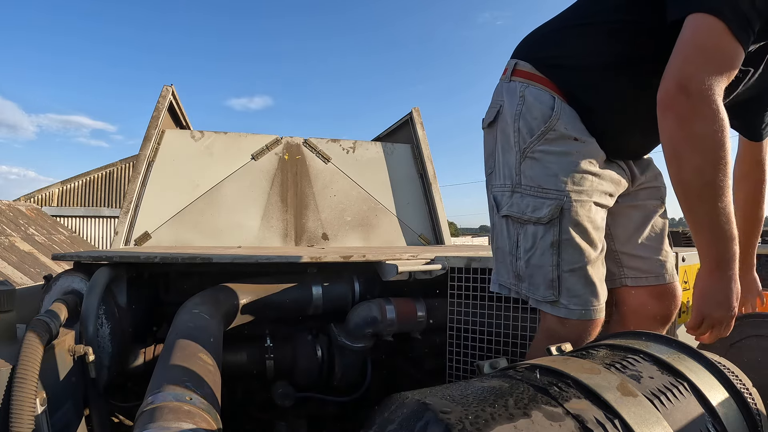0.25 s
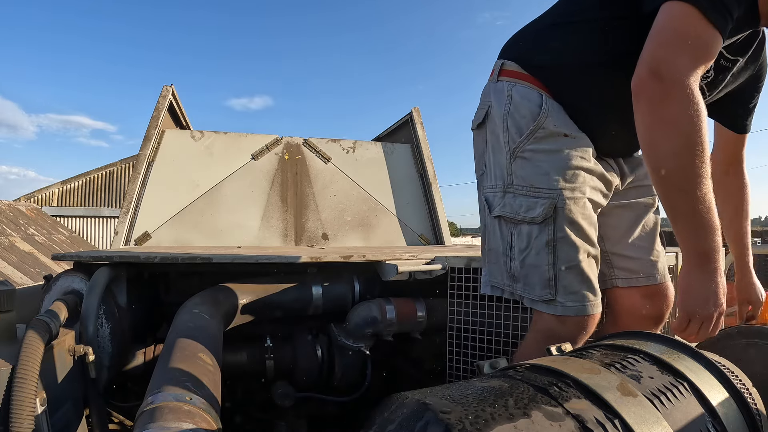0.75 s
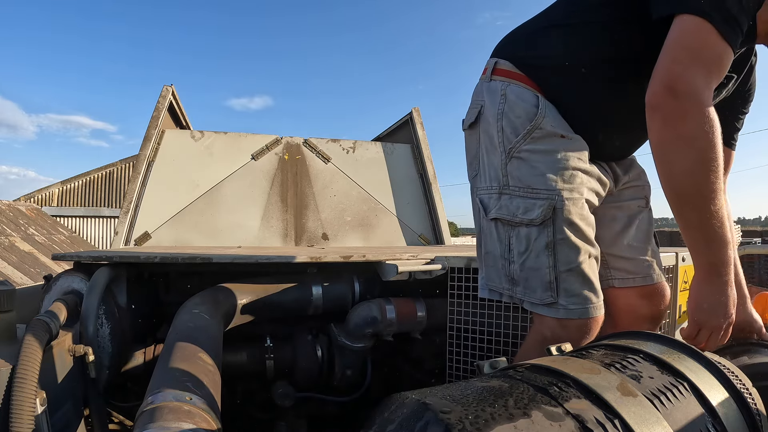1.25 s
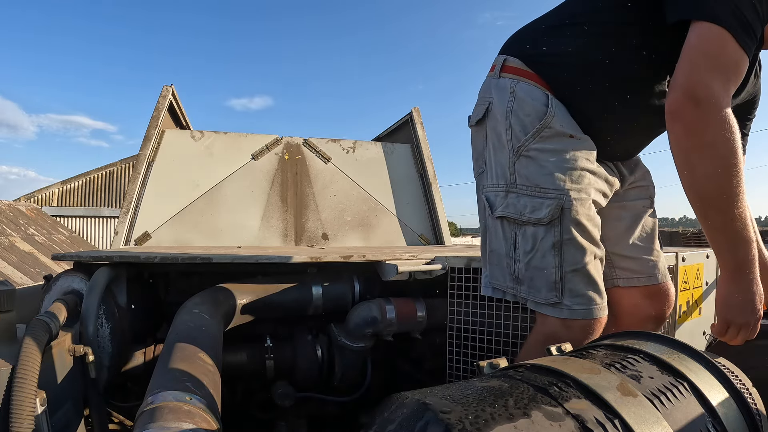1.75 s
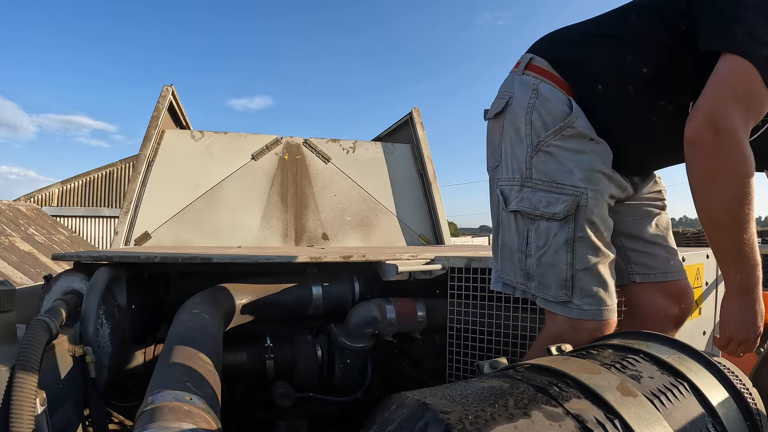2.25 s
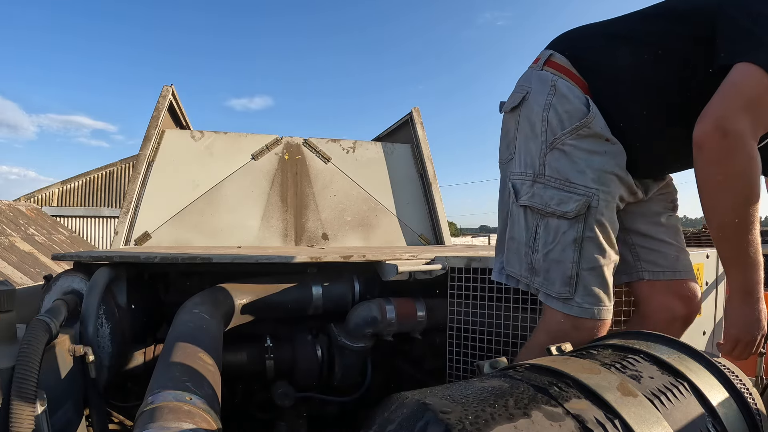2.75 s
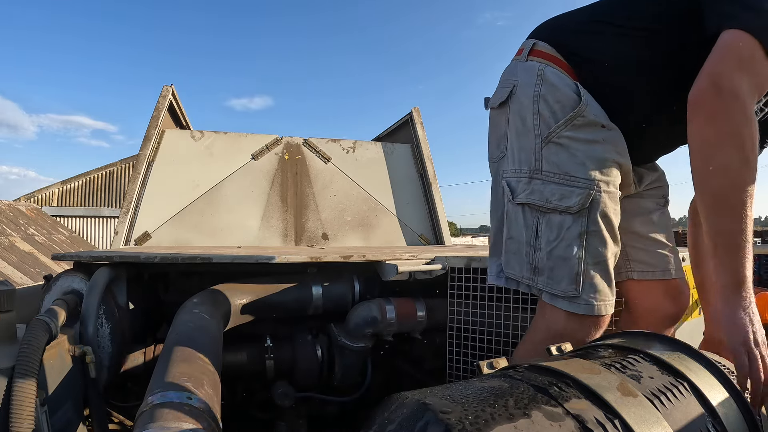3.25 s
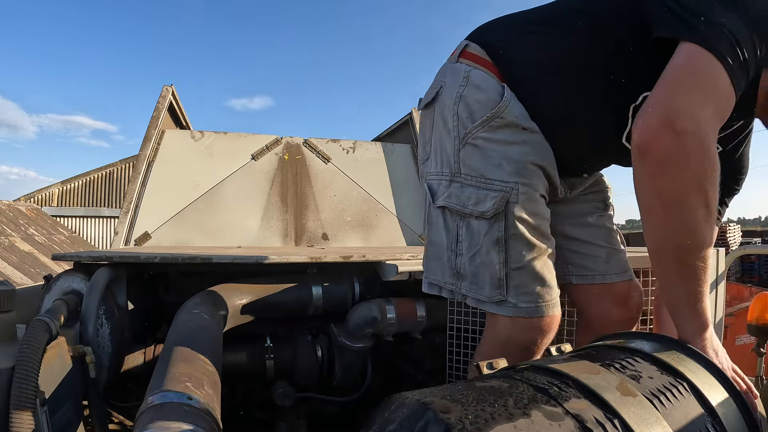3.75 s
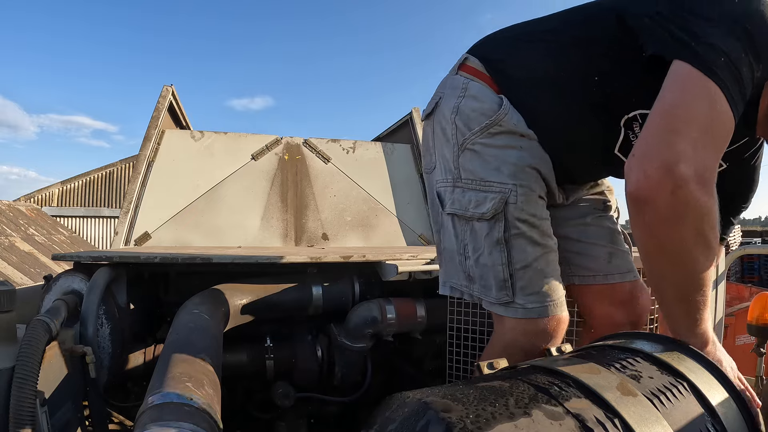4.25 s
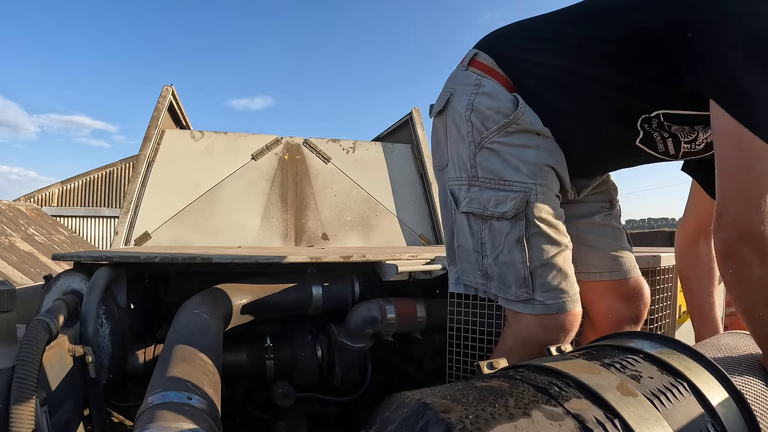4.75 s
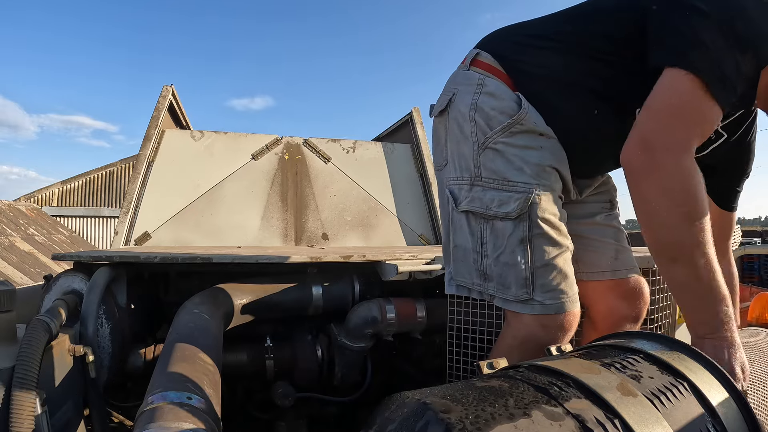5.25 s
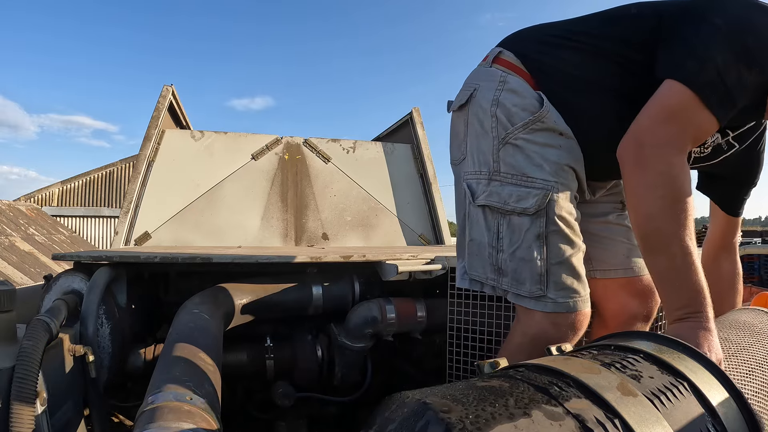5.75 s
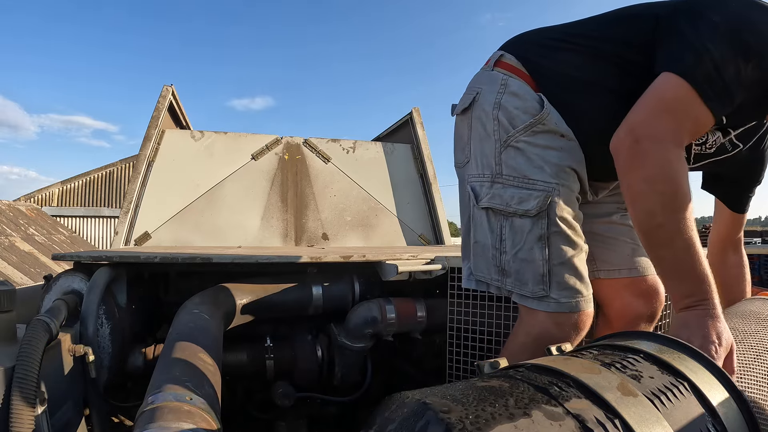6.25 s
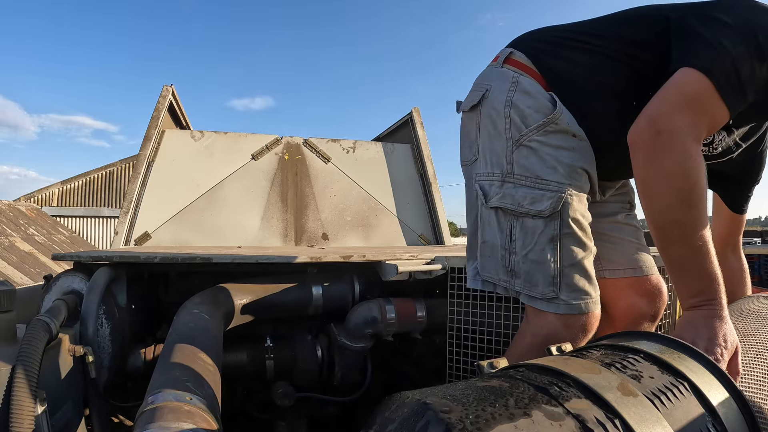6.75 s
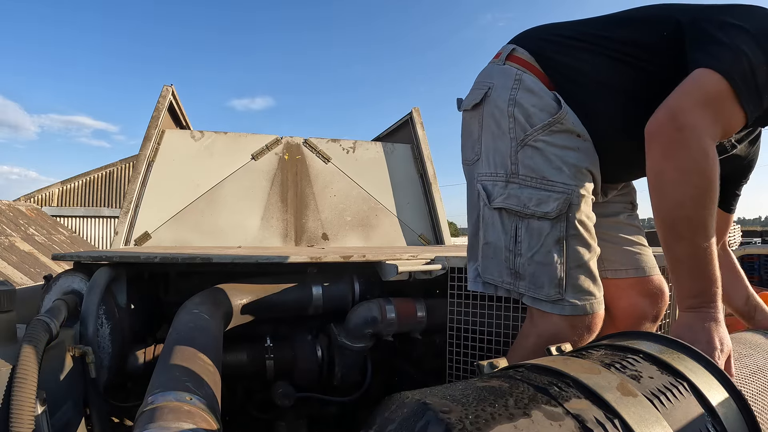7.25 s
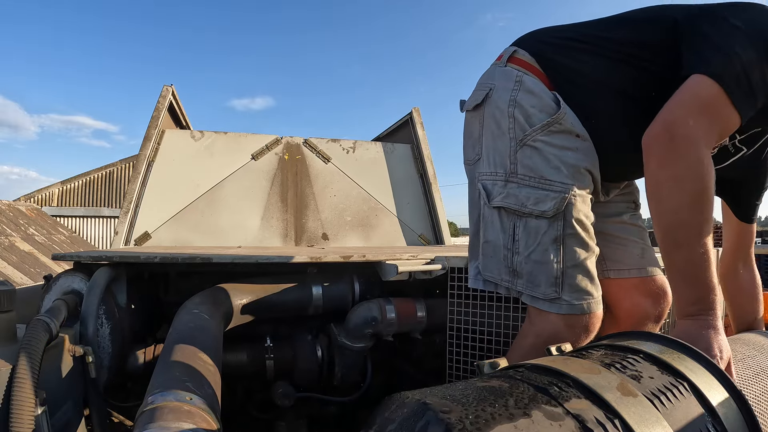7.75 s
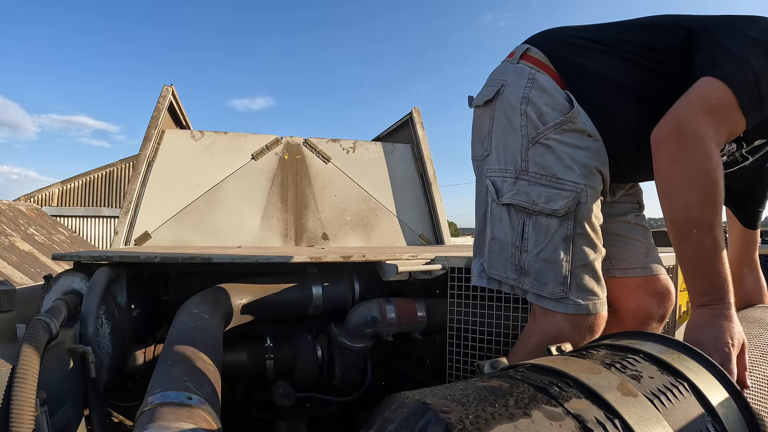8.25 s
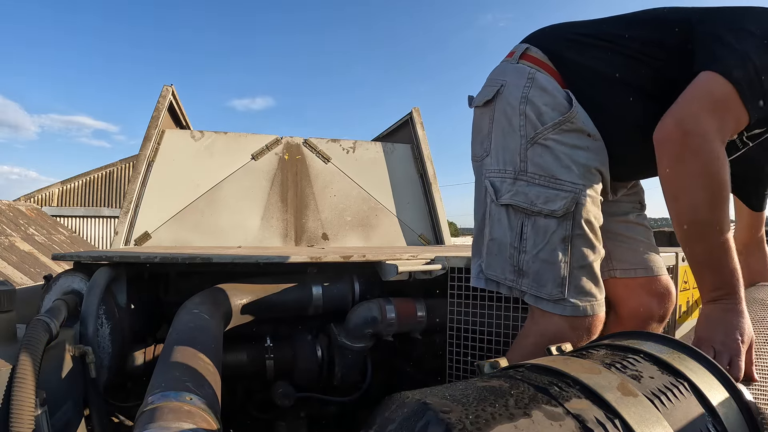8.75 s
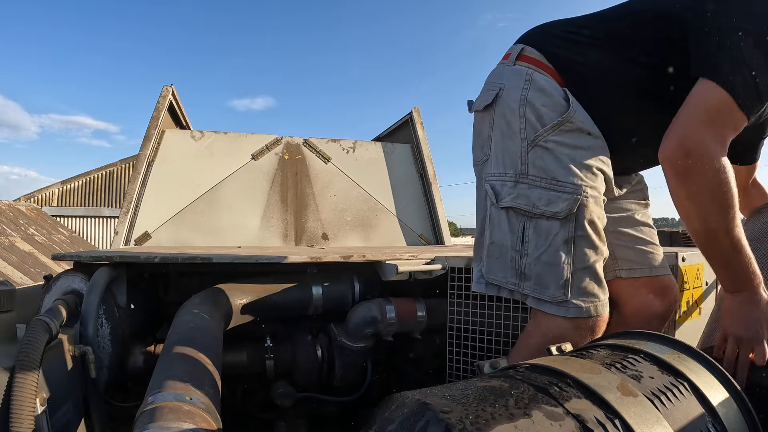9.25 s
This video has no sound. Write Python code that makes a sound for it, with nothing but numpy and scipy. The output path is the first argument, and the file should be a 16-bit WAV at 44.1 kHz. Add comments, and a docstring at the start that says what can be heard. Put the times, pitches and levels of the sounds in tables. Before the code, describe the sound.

Outdoors, close to a large steel filter canister on a machine. A clank and hollow boom open, then bursts of knocks, raspy latch snaps and gritty drags come with uneven pauses. Heavier booming bangs and a short groan follow midway, then more clanks near the end. Faint low rumble lies underneath, with a few distant bird chirps.

```python
"""Wrestling a filter out of a steel canister

Outdoors, latches are snapped open on a big steel air-filter canister and the long element is wrestled out.
Knocks ring modes of wall and latches, and soft juddering pushes boom in the drum. Between them clumped
stick-slip grains make the seal and mesh drag and grind, bright grains rasp and slipping contacts groan.
Coloured noise rumbles underneath; gliding sines are a few far birds and last a faint, nearly steady insect."""
import sys
import numpy as np
from scipy import signal
from scipy.fft import rfft, irfft, next_fast_len
from scipy.io import wavfile

SR = 44100
rng = np.random.default_rng(int(sys.argv[2]) if len(sys.argv) > 2 else 0)


def file_out(sig):
    """Save sig as 16-bit WAV at sys.argv[1]."""
    # one column per channel
    cols = np.atleast_2d(sig).T
    # limit, then scale
    lim = np.clip(cols, -1, 1)
    pcm = np.round(lim * 32767).astype(np.int16)
    wavfile.write(sys.argv[1], SR, pcm)


N = 418509   # length in samples

# Modes of the drum's body. Each row: frequency in Hz, relative level in dB, undamped decay by 60 dB in seconds.
DRUM_MODES = [(66, -16, 0.054), (89, 0, 0.33), (109.3, -11, 0.18), (130.7, 3, 0.15), (151, 2, 0.22),
              (182.4, 4.5, 0.092), (244.3, 4.5, 0.11), (297, 0.5, 0.16), (340.6, -9, 0.4),
              (402.4, -9, 0.37)]
# Modes of the steel wall. Each row: frequency in Hz, relative level in dB, undamped decay by 60 dB in seconds.
WALL_MODES = [(445, 8.5, 0.022), (560, 0, 0.1), (656, 2.5, 0.023), (799, 7, 0.038), (872, 2, 0.078),
              (988, 9.5, 0.018), (1150, 5.5, 0.038), (1389, 0, 0.042), (1580, -5, 0.033),
              (1840, -8.5, 0.024), (2380, -20.5, 0.038), (3020, -19.5, 0.013), (3400, -31.5, 0.0044)]
# Edges between the ranges of rumble, drum, wall and grit
DRUM_LOW_HZ, DRUM_TOP_HZ, WALL_TOP_HZ = 68, 400, 2500


def amp(db):
    """Turns dB into a linear gain."""
    return 10 ** (np.asarray(db) / 20)


def rms_one(x):
    """Scales a sound to rms 1."""
    return x / np.sqrt(np.mean(x ** 2) + 1e-20)


def add(out, s, sound):
    """Mixes a short sound in at time s."""
    at = round(s * SR)
    out[at:at + len(sound)] += sound[:N - at]


def drift(rate):
    """Slow chance: noise through two equal low-pass poles at rate (Hz); rms 1."""
    r = np.exp(-2 * np.pi * rate / SR)
    noise = rng.standard_normal(N + SR)
    settled = signal.lfilter([1], [1, -2 * r, r * r], noise)[SR:]
    return rms_one(settled)


def coloured(x, spectrum, low_hz=0, high_hz=SR):
    """Filters x by the spectrum's curve between two soft edges; rms 1."""
    size = next_fast_len(N)
    hz = np.fft.rfftfreq(size, 1 / SR) + 1   # the 1 keeps log(hz) finite
    table = np.array(spectrum)
    edges = 1 / np.sqrt((1 + (low_hz / hz) ** 8) * (1 + (hz / high_hz) ** 8))
    curve_db = np.interp(np.log(hz), np.log(table[:, 0]), table[:, 1])
    return rms_one(irfft(rfft(x, size) * edges * amp(curve_db), size)[:N])


def grains(per_s, spread_db):
    """Random clicks of uneven size and sign, as many small contacts give."""
    sizes = amp(spread_db * np.minimum(rng.exponential(1, N), 4))
    signs = rng.choice([-1, 1], N)
    return sizes * signs * (rng.random(N) < per_s / SR)


def pressure():
    """Gains of drum, wall and grit: each stroke bites fast, holds and eases off, over the light rubbing."""
    # Strokes, each a tug or twist of the element.
    # Each row: full bite in seconds, hold in seconds, drum level in dB, wall level in dB, grit level in dB.
    strokes = [(0.045, 0.047, -21.5, -29, -46), (0.49, 0.01, -37, -45, -56),
               (0.949, 0.029, -38, -35.5, -45), (1.049, 0.01, -27.5, -30, -37),
               (1.17, 0.0041, -11.5, -25.5, -38.5), (1.36, 0.15, -29, -53, -58),
               (1.881, 0.0067, -25.5, -33, -39.5), (2.181, 0.14, -27.5, -38, -51.5),
               (2.549, 0.47, -37.5, -58, -72), (2.7, 0.0048, -20.5, -27.5, -38),
               (2.83, 0.092, -28, -35.5, -47), (3.0, 0.071, -33.5, -58, -73),
               (3.14, 0.06, -34.5, -43.5, -52), (3.378, 0.0046, -26, -80, -57),
               (3.954, 0.01, -37, -48.5, -69), (4.253, 0.032, -34.5, -38, -55.5),
               (4.457, 0.098, -25, -19.5, -35), (4.509, 0.16, -17, -25.5, -44),
               (4.67, 0.0045, -26, -35, -57), (4.801, 0.2, -23.5, -32, -66),
               (5.099, 0.014, -25.5, -41, -60), (5.646, 0.2, -41.5, -50.5, -71),
               (6.148, 0.081, -25.5, -34.5, -51.5), (6.329, 0.068, -37, -41.5, -62.5),
               (6.56, 0.09, -35, -48, -58), (6.959, 0.01, -41, -49, -67), (7.248, 0.067, -31.5, -30, -40.5),
               (7.32, 0.02, -18.5, -26.5, -36.5), (7.37, 0.042, -21.5, -37.5, -47),
               (7.55, 0.051, -32.5, -46.5, -57), (7.68, 0.033, -26, -43, -56),
               (7.771, 0.073, -27, -34, -48.5), (8.31, 0.095, -17, -27, -46.5),
               (8.844, 0.045, -36.5, -41.5, -80), (8.908, 0.045, -34, -31.5, -49.5),
               (9.0, 0.012, -23, -58, -50), (9.07, 0.057, -34.5, -45, -54),
               (9.359, 0.013, -30, -40.5, -67.5), (9.43, 0.083, -51, -48, -49.5)]
    # Light rubbing that goes on between. Each row: time in seconds, drum level in dB, wall level in dB.
    light_rubbing = [(0.0, -46, -61), (0.17, -31, -34), (0.3, -35.5, -58), (0.9, -43, -56),
                     (1.21, -26, -44), (1.95, -41.5, -69.5), (2.77, -35.5, -41.5), (3.65, -41, -66),
                     (4.34, -41, -57), (4.65, -28.5, -50), (4.86, -25.5, -43.5), (5.31, -33.5, -71),
                     (6.13, -46.5, -73.5), (6.32, -31, -48), (6.709, -34.5, -72), (7.19, -42, -46.5),
                     (7.4, -30, -63), (7.9, -30, -51.5), (9.49, -40, -79.5)]
    # How fast a stroke bites: drum, wall and grit rise [dB per second].
    bite_db_per_s = (498.5, 601.5, 605)
    # How fast a stroke eases off: drum, wall and grit fall [dB per second].
    ease_db_per_s = (109, 148.5, 245.5)
    grit_under_wall_db = -9.5

    t = np.arange(0, N / SR + .002, .002)   # coarse steps of 2 ms
    s, drum_db, wall_db = np.transpose(light_rubbing)
    light = [np.interp(t, s, db) for db in (drum_db, wall_db, wall_db + grit_under_wall_db)]
    bite, held, *levels = np.array(strokes).T[:, :, None]
    early = np.maximum(bite - t, 0)
    late = np.maximum(t - bite - held, 0)
    gains = []
    for light_db, stroke_db, rise, ease in zip(light, levels, bite_db_per_s, ease_db_per_s):
        stroke_gains = amp(stroke_db - rise * early - ease * late)
        power = amp(light_db) ** 2 + (stroke_gains ** 2).sum(axis=0)
        gains.append(np.interp(np.arange(N) / SR, t, np.sqrt(power)))
    return gains


def ringing(x, modes, damping):
    """Steady contact keeps the modes sounding; hands shorten their decay by the damping factor; rms 1."""
    out = 0
    for hz, level_db, t60 in modes:
        r = amp(-60 / (t60 * damping * SR))
        w = 2 * np.pi * hz / SR
        mode = signal.lfilter([0, 1], [1, -2 * r * np.cos(w), r * r], x)
        out = out + amp(level_db) * rms_one(mode)
    return rms_one(out)


def patchy(x, spectrum):
    """Colours x above the wall's range; each band flickers on its own, as different bits of mesh catch; rms 1."""
    # Edges of the flickering bands, lowest first [Hz].
    edges_hz = (2500, 3300, 4400, 5800, 7700, SR)
    flicker_db, flicker_hz = 5.5, 9.0

    whole = coloured(x, spectrum, low_hz=WALL_TOP_HZ)
    flat = [(10, 0), (SR, 0)]
    parts = [coloured(whole, flat, high_hz=hz) for hz in edges_hz[1:]]
    # give each low-passed part back the size it has within the whole
    sizes = [np.mean(whole * part) for part in parts]
    lows = [0] + [size * part for size, part in zip(sizes, parts)]
    out = 0
    for lower, upper in zip(lows, lows[1:]):
        out = out + (upper - lower) * amp(flicker_db * drift(flicker_hz))
    return rms_one(out)


def drag():
    """Clumped stick-slip grains: broad scrape noise plus the modes of drum and wall."""
    # Spectrum of dragging seal and mesh. Each row: frequency in Hz, relative level in dB per Hz.
    scrape = [(15, -43), (25, 4), (173, 8), (215, -6.5), (399, -6.5), (582, -12), (804, -19.5), (1110, -13),
              (1660, -19), (3200, -35), (7000, -47.5), (8300, -71), (11000, -80), (12800, -68.5),
              (15500, -86.5)]
    drum_ring, wall_ring = 1.0, .6   # share of modes beside the broad scrape

    drum, wall, grit = pressure()
    clumps = drift(25)
    slips = grains(2000 * amp(3.0 * clumps), 1.3) * amp(2.83 * drift(60))
    # the heavy drum feels only the sum of many slips
    heave = rng.standard_normal(N) * amp(1.16 * clumps)
    low = coloured(heave, scrape, DRUM_LOW_HZ, DRUM_TOP_HZ)
    low = low + drum_ring * ringing(heave, DRUM_MODES, damping=0.37)
    mid = coloured(slips, scrape, DRUM_TOP_HZ, WALL_TOP_HZ)
    mid = mid + wall_ring * ringing(slips, WALL_MODES, damping=1.0)   # 1 leaves the wall undamped
    high = patchy(grains(9000, 1.3) * amp(1.8 * clumps), scrape)
    return drum * rms_one(low) + wall * rms_one(mid) + grit * rms_one(high)


def rumble():
    """Lumpy low noise with a faint hiss above it, and deep buffeting of changing strength."""
    # Spectrum of the rumble and hiss. Each row: frequency in Hz, relative level in dB per Hz.
    spectrum = [(12, -34.5), (20, 1.5), (43, -4.5), (155, -19.5), (445, -7.5), (733, -22.5), (1080, -56),
                (3970, -52.5), (6530, -42), (8620, -71.5), (15000, -64.5)]
    # Deep buffeting felt through the deck. Each row: time in seconds, level in dB.
    buffeting = [(0.0, -36), (0.9, -39), (1.14, -32), (1.95, -42), (3.33, -28), (4.1, -47.5), (4.62, -21.5),
                 (5.74, -37.5), (8.24, -36.5), (8.351, -25.5), (9.49, -34.5)]
    rumble_db, lumps_db = -54, 1.3

    deep = coloured(rng.standard_normal(N), spectrum, high_hz=DRUM_LOW_HZ)
    deep_db = np.interp(np.arange(N) / SR, *np.transpose(buffeting))
    steady = coloured(rng.standard_normal(N), spectrum)
    return amp(rumble_db + lumps_db * drift(2.4)) * steady + amp(deep_db) * deep


def rasps():
    """Dense, clumped bright grains in short cubed swells, as of latch springs rasping free."""
    # Bright rasps. Each row: three swell times in seconds, full level in dB; two rows are out of order,
    # and the one at 7.777 s is unheard.
    swells = [(0.01, 0.027, 0.17, -40), (0.92, 0.949, 1.01, -27), (1.003, 1.038, 1.12, -28.5),
              (1.142, 1.137, 1.34, -39), (1.875, 1.905, 1.98, -42), (1.967, 1.997, 2.24, -55),
              (2.624, 2.65, 2.74, -31.5), (2.782, 2.813, 2.96, -31.5), (7.777, 7.78, 6.7, -64)]
    # Spectrum of a rasp. Each row: frequency in Hz, relative level in dB per Hz.
    spectrum = [(710, -15.5), (1200, -2), (1710, -14), (2650, -13.5), (3650, -19.5), (5730, -13),
                (6870, -14.5), (8790, -28), (10900, -31.5), (12800, -29), (15500, -43.5)]

    t, swell = np.arange(N) / SR, 0
    for *times, level_db in swells:
        swell = swell + amp(level_db) * np.interp(t, times, [0, 1, 0]) ** 3
    clumped = grains(6000, 3.2) * amp(3.0 * drift(70))
    return swell * coloured(clumped, spectrum)


def touch(chatter, s, t60, soft_s):
    """A first touch and a dying chatter of further contacts, none of them instant."""
    at = round(s * SR)
    contact = chatter[at:at + round(t60 * SR)]
    dying = .3 * contact * amp(np.linspace(0, -60, len(contact)))
    return np.convolve(np.r_[1, dying], np.hanning(round(soft_s * SR)))


def struck(modes, favoured_hz, tilt_db, chance_db, contact):
    """Rings all modes through the given contact; the spot that is hit favours those near one pitch; peak 1."""
    hz, level_db, t60 = np.array(modes).T[:, :, None]
    t = np.arange(round(t60.max() * SR)) / SR
    octaves = np.log2(hz / favoured_hz)
    favour_db = 9 * np.exp(-(octaves / .2) ** 2)
    spot_db = favour_db + tilt_db * octaves + chance_db[:, None]
    decaying = amp(level_db + spot_db - 60 * t / t60)
    ring = (decaying * np.sin(2 * np.pi * hz * t)).sum(axis=0)
    sound = signal.fftconvolve(ring, contact)
    return sound / np.abs(sound).max()


def knocks():
    """Each blow rings wall or latch and throws off a puff of bright grit; a tick is a slower-dying puff alone."""
    # Knocks on the wall. Each row: start in seconds, ring's peak in dB, brightness in dB per octave,
    # grit level in dB, favoured pitch in Hz.
    wall_blows = [(0.031, -8.5, -15, -35, 590), (0.172, -19, -2, -35, 990), (0.472, -30, 9, -44, 1020),
                  (1.043, -15.5, -11, -24.5, 654), (1.152, -12.5, -5, -24, 613), (1.199, -20, 17, -35, 890),
                  (1.235, -23, 7, -34, 611), (1.866, -24.5, 18, -63, 563), (1.903, -18, 11, -22, 1090),
                  (2.158, -19.5, -8.5, -45.5, 1170), (2.225, -20.5, 22.5, -43, 870),
                  (2.268, -19, -2, -38, 1170), (2.611, -22, 1, -41.5, 560), (2.649, -13, -7, -26, 566),
                  (2.676, -10.5, -7, -25, 1890), (4.422, -18.5, -16.5, -34.5, 770),
                  (4.454, -15, 17, -30, 756), (4.503, -10.5, -7, -27, 1000), (4.69, -5.5, 19, -37, 1080),
                  (4.817, -13, 4.5, -60, 1150), (4.853, -12, -13, -64, 1160), (4.983, -11, -32, -54, 633),
                  (5.036, -13, -9.5, -41, 1400), (6.123, -9.5, -14.5, -59, 1430),
                  (6.187, -23, 1, -36, 2400), (6.356, -21.5, -4, -31.5, 1190), (6.544, -26, -18, -61, 1150),
                  (6.607, -27.5, -6, -40.5, 1370), (6.713, -33, 25, -54, 1210),
                  (7.199, -17.5, -25, -33, 1480), (7.203, -17, -8, -61, 477), (7.296, -10.5, 3, -22, 1870),
                  (7.317, -3, -11.5, -44, 1900), (7.709, -22.5, -8, -37.5, 1530),
                  (7.769, -23, -10, -46, 810), (7.915, -25, 8, -40.5, 815), (8.187, -18, -12.5, -53, 690),
                  (8.289, -5.5, -3.5, -42, 730), (8.328, -9, -16, -59, 750), (8.359, -1.5, 1, -33, 754),
                  (8.393, -4, -3.5, -52, 743), (8.897, -9, 1, -41, 696), (8.954, -7, -8.5, -33, 450),
                  (8.973, -17, 4, -37, 800), (9.447, -17, 27, -35, 1920)]
    # A steel latch snaps over. Each row: start in seconds, ring's peak in dB, brightness in dB per octave,
    # grit level in dB, favoured pitch in Hz.
    latch_snaps = [(2.664, -16.5, -5, -17, 2290), (2.811, -16.5, -6, -23.5, 1680), (2.827, -7, 1, -22, 980),
                   (3.161, -16.5, -8, -25, 1680), (3.181, -28, -3, -50, 2640), (7.8, -17, -4.5, -25, 900),
                   (7.812, -14, 4, -34, 1100)]
    # Modes of a latch. Each row: frequency in Hz, relative level in dB, decay by 60 dB in seconds.
    latch_modes = [(794, 0, .085), (1145, -3, .07), (1390, -7, .06), (1680, -3, .05), (2290, -12, .05),
                   (2640, -11, .07), (2950, -10, .06), (3380, -15, .07)]
    # Snap of grit. Each row: frequency in Hz, relative level in dB per Hz.
    grit_spectrum = [(880, -18.5), (1500, -9.5), (2310, -11.5), (3690, -19), (4610, -23), (5890, -26.5),
                     (7000, -31.5), (8200, -48), (11000, -56), (12800, -45), (15500, -57)]
    # Small ticks of loose clips and grit. Each row: start in seconds, level in dB before halving.
    small_ticks = [(1.0685, -32), (1.2837, -38.5), (1.353, -36), (1.6175, -44.5), (2.011, -37),
                   (2.441, -39.5), (2.53, -39.5), (2.717, -34), (2.911, -48), (4.326, -48), (4.7394, -39),
                   (4.777, -44), (4.9444, -39.5), (7.0963, -51), (8.137, -46.5), (8.24, -38.5),
                   (9.473, -30.5)]
    chatter_t60_s, puff_t60_s, puff_rise_s = .035, 0.081, 0.00091

    out, t = np.zeros(N), np.arange(SR // 5) / SR
    chatter = grains(2500, 6.1)
    grit = np.r_[coloured(grains(9000, 2.5), grit_spectrum), 0 * t]   # silent tail for late puffs
    puff = amp(-60 * t / puff_t60_s) * np.minimum(t / puff_rise_s, 1)
    for blows, modes in ((wall_blows, WALL_MODES), (latch_snaps, latch_modes)):
        chance = rng.normal(0, 3, (len(blows), len(modes)))   # dB, for each mode of each blow
        for (s, peak_db, tilt_db, grit_db, hz), chance_db in zip(blows, chance):
            contact = touch(chatter, s, chatter_t60_s, soft_s=0.00036)
            add(out, s, amp(peak_db) * struck(modes, hz, tilt_db, chance_db, contact))
            add(out, s, amp(grit_db) * grit[round(s * SR):][:len(t)] * puff)
    for s, level_db in small_ticks:
        add(out, s, amp(level_db) / 2 * grit[round(s * SR):][:len(t)] * puff ** 0.68)
    return out


def thuds():
    """Soft, juddering pushes set the drum's modes booming."""
    # Thuds into the drum. Each row: start in seconds, peak in dB before the high-pass, favoured pitch in Hz.
    pushes = [(0.039, -6, 107), (1.056, -13.5, 73.5), (1.153, -4.5, 166), (1.2, -12.5, 83.4),
              (1.857, -14.5, 110), (2.155, -8.5, 125), (2.223, -11.5, 145), (2.266, -9.5, 291),
              (2.665, -5.5, 140.4), (3.004, -15.5, 149), (3.351, -14, 109), (3.963, -30, 340),
              (4.238, -22.5, 184), (4.489, -5.5, 187), (4.69, -2.5, 184), (5.031, -8, 171),
              (6.124, -5.5, 189), (6.197, -11.5, 177), (7.261, -10.5, 135), (7.297, -6.5, 152),
              (7.318, -10, 400), (8.287, -4, 182), (8.359, -5, 137), (8.394, -4.5, 141), (8.935, -2.5, 187),
              (9.35, -14.5, 297), (9.45, -7, 204)]

    out, judder = np.zeros(N), grains(300, 1.8)
    chance = rng.normal(0, 3, (len(pushes), len(DRUM_MODES)))   # dB, for each mode of each push
    for (s, peak_db, hz), chance_db in zip(pushes, chance):
        contact = touch(judder, s, 0.19, soft_s=0.0014)
        add(out, s, amp(peak_db) * struck(DRUM_MODES, hz, 1.0, chance_db, contact))
    # the thuds carry little below 68 Hz
    return signal.sosfilt(signal.butter(2, DRUM_LOW_HZ, "high", fs=SR, output="sos"), out)


def birds_and_insect():
    """Thin gliding sines, blurred in pitch and fluttering in level with distance."""
    # Far birds, and last (two rows) a faint steady insect tone.
    # Each row: start and end in seconds, first and last pitch in Hz, level in dB.
    whistles = [(0.505, 0.66, 7060, 6600, -74), (0.754, 0.86, 6850, 6700, -75),
                (1.514, 1.693, 5130, 4830, -72), (1.713, 1.865, 6400, 5600, -65.5),
                (2.125, 2.287, 8100, 7660, -80), (2.365, 2.415, 5940, 5300, -66),
                (3.5, 3.603, 7850, 7950, -84), (4.007, 4.103, 5900, 5700, -77),
                (4.153, 4.323, 7400, 6850, -72), (5.202, 5.27, 3400, 4500, -68),
                (5.275, 5.323, 4700, 5600, -67.5), (5.282, 5.322, 6030, 6700, -67.5),
                (8.452, 8.624, 4840, 4740, -77), (8.67, 8.824, 4800, 4720, -82)]

    out = np.zeros(N)
    waver, flutter_db = drift(400), 5 * drift(100)
    for start, end, first_hz, last_hz, level_db in whistles:
        span = slice(round(start * SR), round(end * SR))
        # echoes smear fast glides most
        blur_hz = min(.04 * abs(last_hz - first_hz) / (end - start), 220)
        hz = np.linspace(first_hz, last_hz, span.stop - span.start) + blur_hz * waver[span]
        swell = np.hanning(len(hz)) ** 0.12 * amp(level_db + flutter_db[span])
        add(out, start, swell * np.sin(2 * np.pi * np.cumsum(hz) / SR))
    return out


def groans():
    """Uneven slips keep one resonance sounding, whose pitch glides as the contact moves."""
    # Groans and faint rustles. Each row: start and end in seconds, first and last pitch in Hz,
    # width of each filter pole in Hz, level in dB.
    glides = [(0.9, 0.985, 5900, 5600, 1510, -54.5), (3.7, 3.86, 4500, 4250, 860, -69),
              (0.66, 0.776, 5500, 3370, 3200, -65.5), (1.6, 1.83, 1720, 1610, 140, -64.5),
              (1.858, 1.94, 143.4, 155, 22.2, -20), (3.75, 3.89, 1580, 1695, 313, -63),
              (7.26, 7.37, 165.4, 179, 23.1, -20.5), (7.34, 7.55, 118.5, 143.5, 24.8, -23.5),
              (2.24, 2.324, 246, 434, 67, -28), (4.23, 4.266, 473, 947, 40, -35.5),
              (4.453, 4.63, 2550, 2055, 810, -33.5), (4.5, 4.635, 795, 791, 140.4, -20),
              (4.519, 4.64, 1120, 1098, 226.8, -22), (7.196, 7.22, 1377, 1570, 162, -39),
              (7.201, 7.251, 468, 450, 55, -30), (7.279, 7.309, 3530, 3660, 600, -33.5),
              (7.403, 7.464, 2900, 2600, 1500, -47.5), (9.032, 9.048, 784, 1110, 180, -43),
              (9.121, 9.151, 853, 888, 205, -36.5)]
    lead = 2000   # samples in which the resonance settles

    out = np.zeros(N)
    slips = rng.standard_normal(N) + 1j * rng.standard_normal(N)
    for start, end, first_hz, last_hz, width_hz, level_db in glides:
        part = slips[round(start * SR) - lead:round(end * SR)]
        r = np.exp(-np.pi * width_hz / SR)
        wobble = signal.lfilter([1], [1, -2 * r, r * r], part)[lead:]
        # turning the narrow complex noise lifts it to the gliding pitch
        hz = np.linspace(first_hz, last_hz, len(wobble))
        turn = np.exp(2j * np.pi * np.cumsum(hz) / SR)
        swell = np.hanning(len(wobble)) ** 0.27
        add(out, start, amp(level_db) * swell * rms_one((wobble * turn).real))
    return out


def scene():
    """Sums all layers into one channel."""
    return (drag() + rumble() + rasps() + knocks() + thuds() + birds_and_insect() + groans())[None]


def record(dry):
    """Peaks are rounded by a soft clip, then a steep low-pass cuts the top."""
    cutoff_hz = 15720   # from here up the filter takes off at least 60 dB
    rounded = 0.71 * np.tanh(dry / 0.92)
    return signal.sosfilt(signal.cheby2(30, 60, cutoff_hz, fs=SR, output="sos"), rounded)


dry = scene()
out = record(dry)
file_out(out)
```